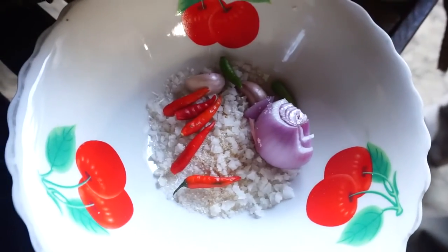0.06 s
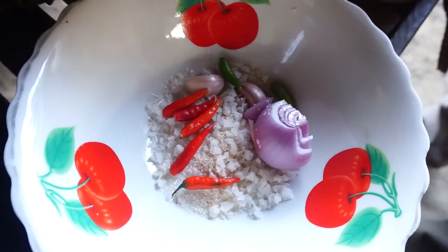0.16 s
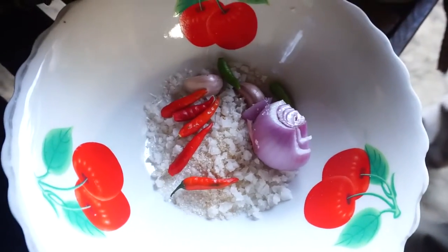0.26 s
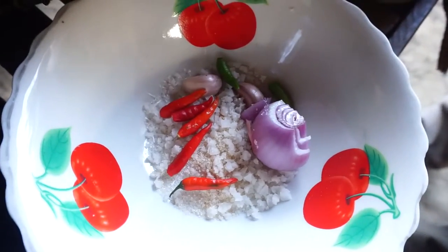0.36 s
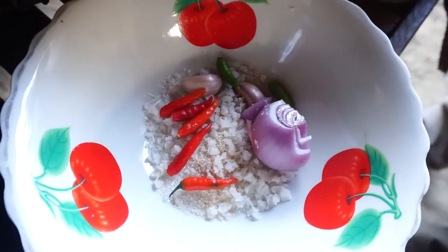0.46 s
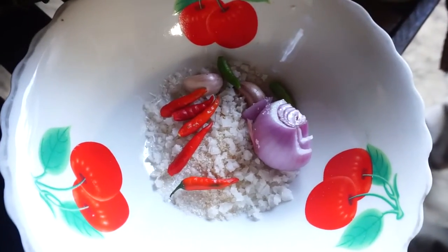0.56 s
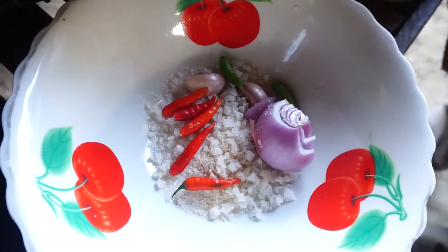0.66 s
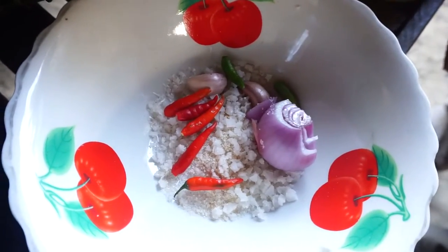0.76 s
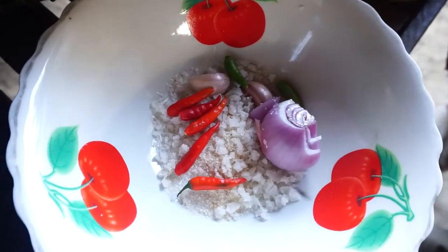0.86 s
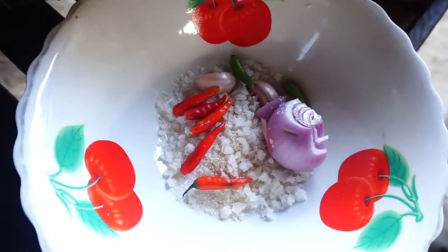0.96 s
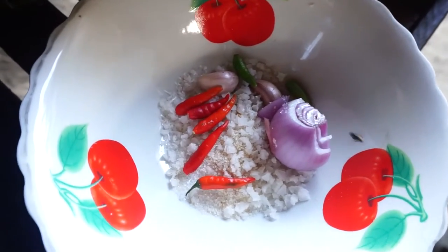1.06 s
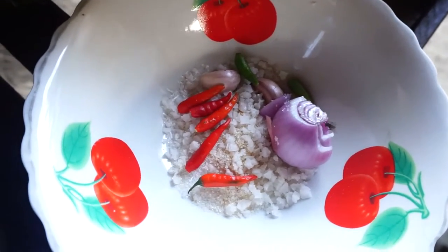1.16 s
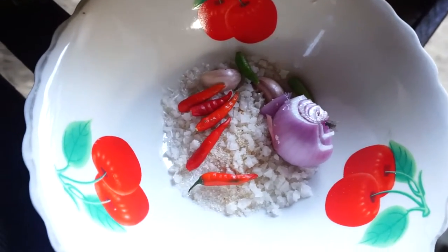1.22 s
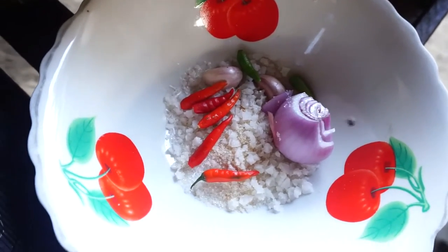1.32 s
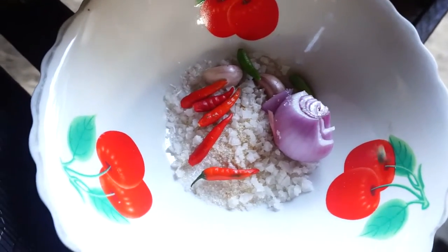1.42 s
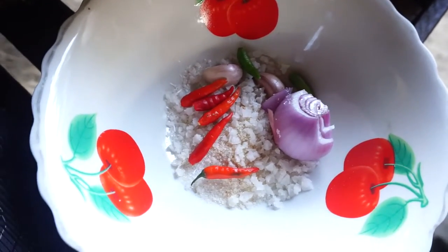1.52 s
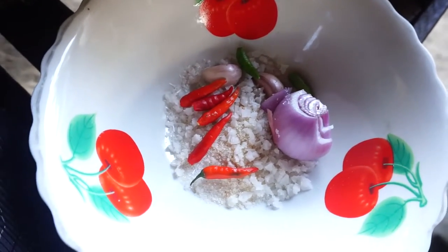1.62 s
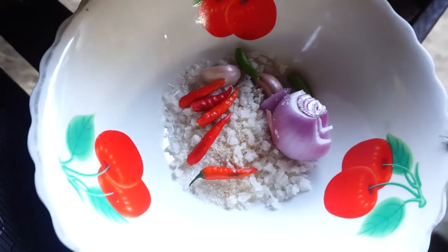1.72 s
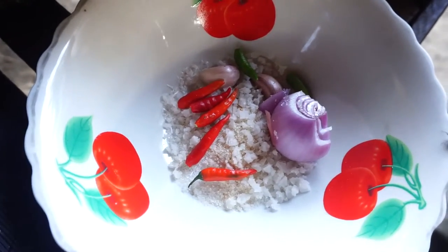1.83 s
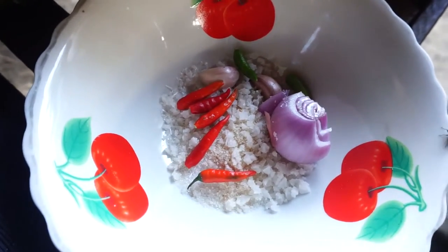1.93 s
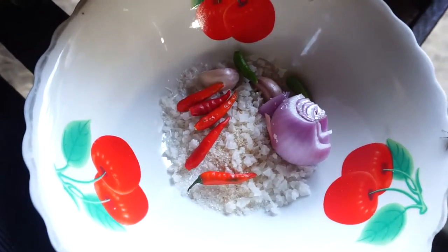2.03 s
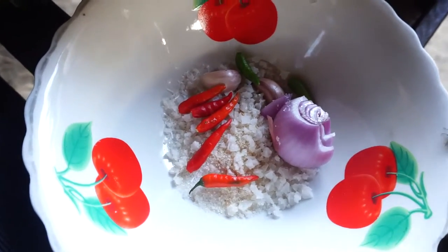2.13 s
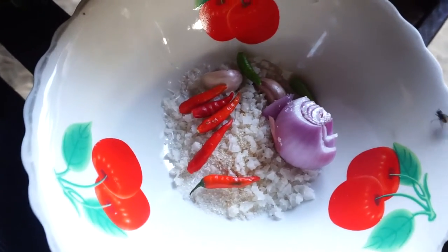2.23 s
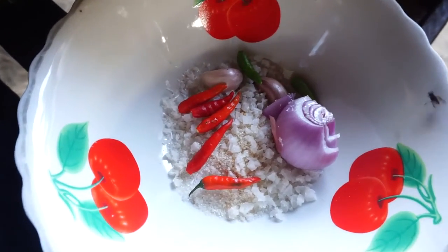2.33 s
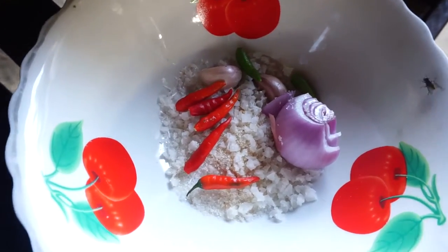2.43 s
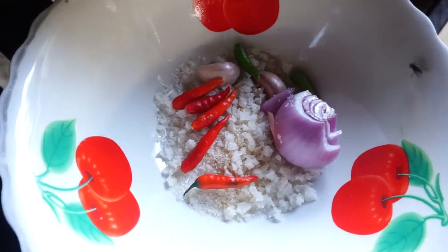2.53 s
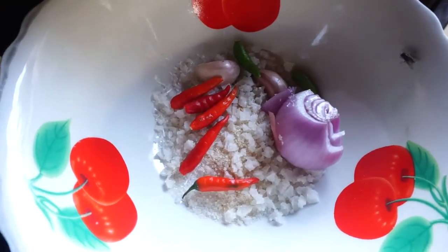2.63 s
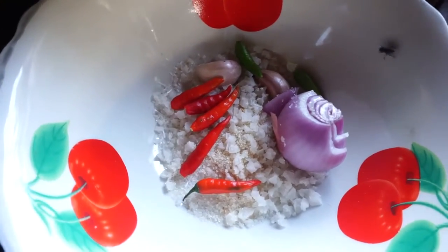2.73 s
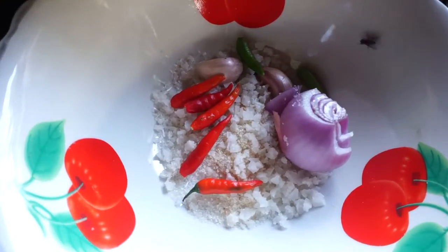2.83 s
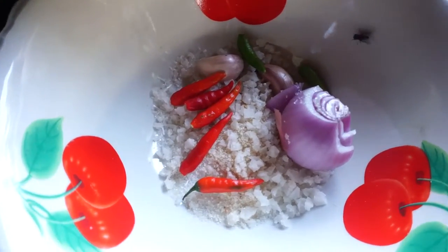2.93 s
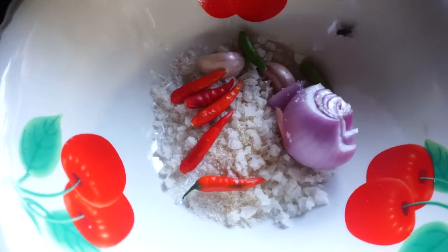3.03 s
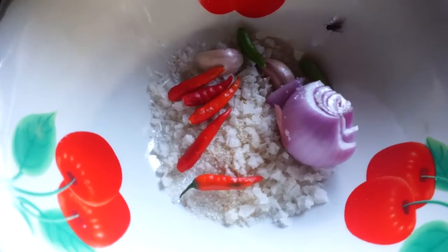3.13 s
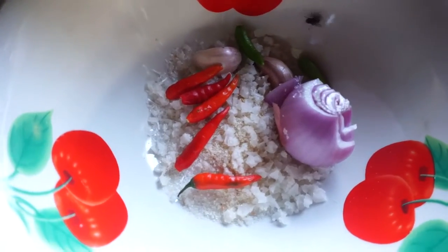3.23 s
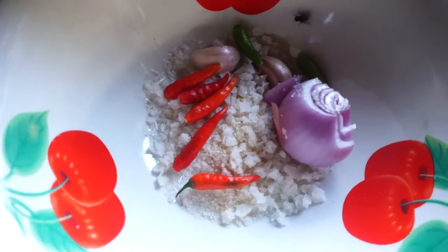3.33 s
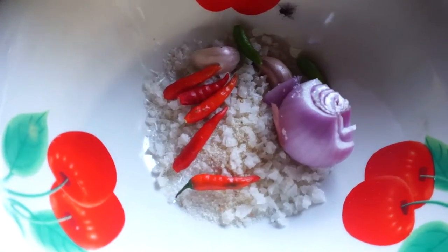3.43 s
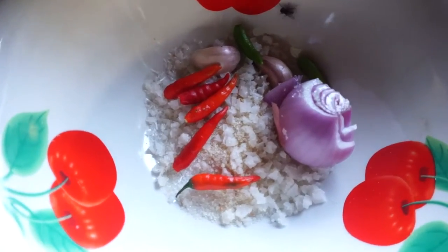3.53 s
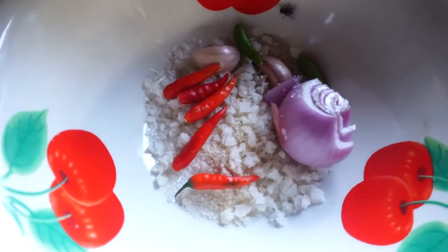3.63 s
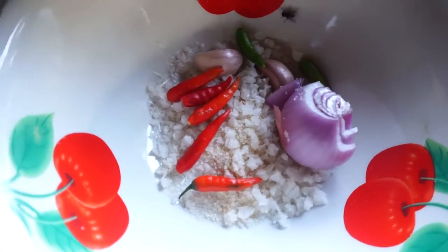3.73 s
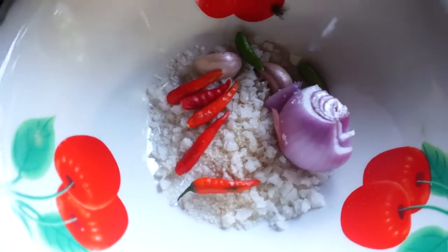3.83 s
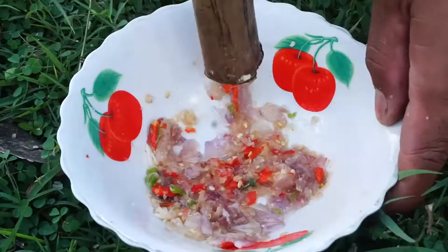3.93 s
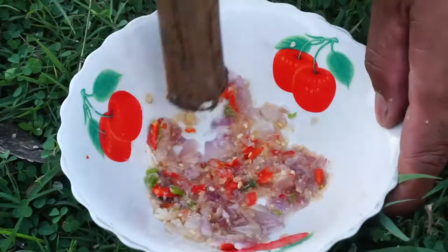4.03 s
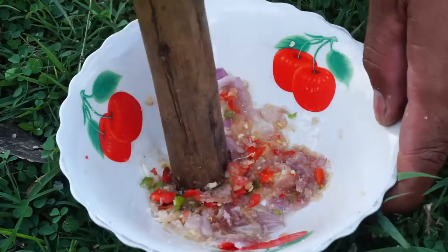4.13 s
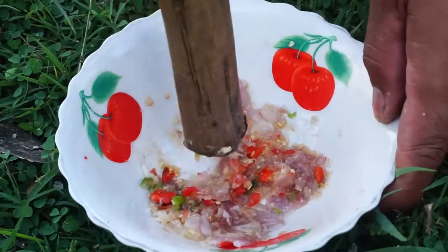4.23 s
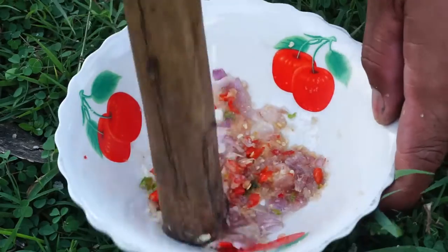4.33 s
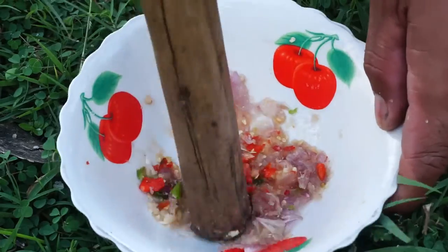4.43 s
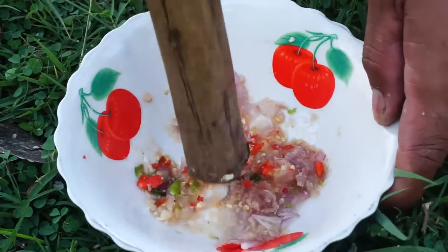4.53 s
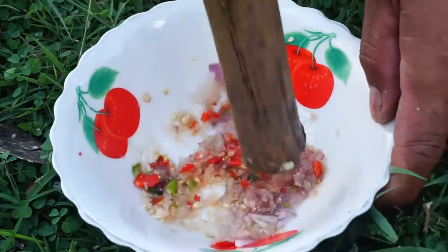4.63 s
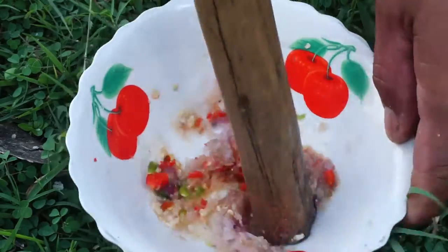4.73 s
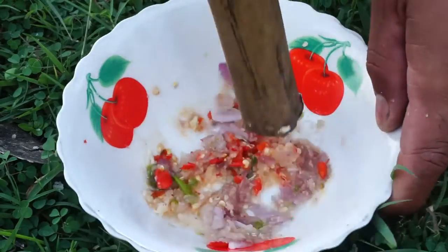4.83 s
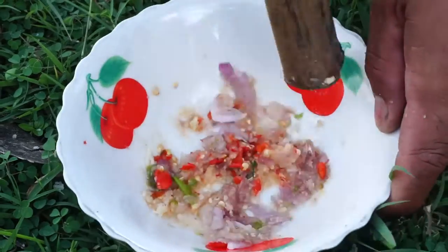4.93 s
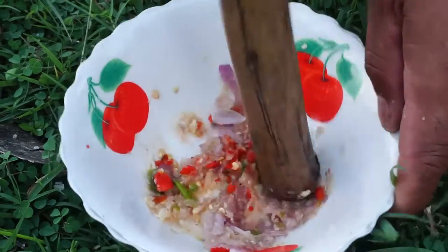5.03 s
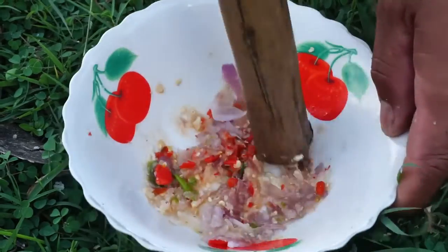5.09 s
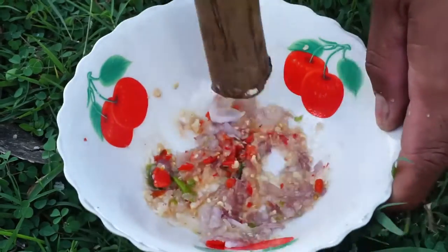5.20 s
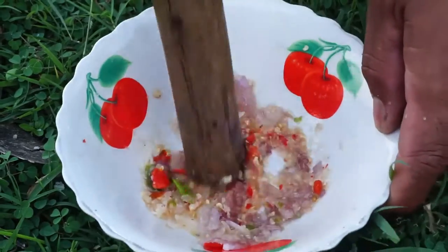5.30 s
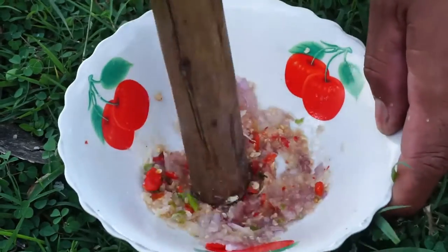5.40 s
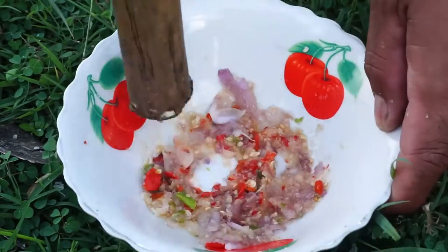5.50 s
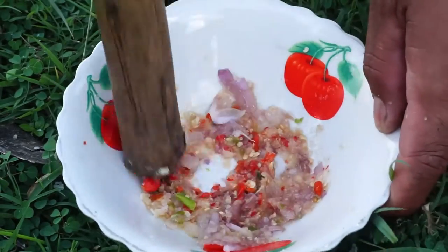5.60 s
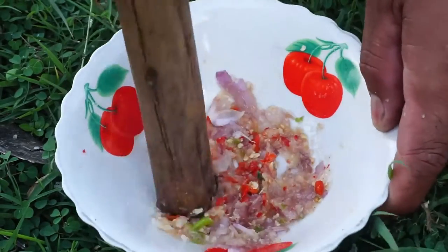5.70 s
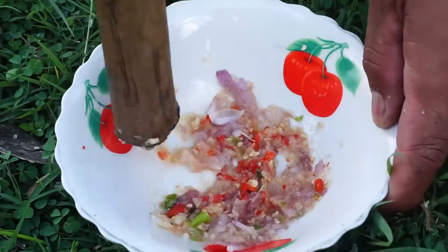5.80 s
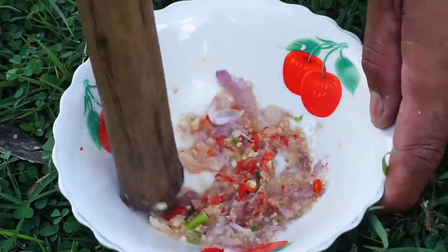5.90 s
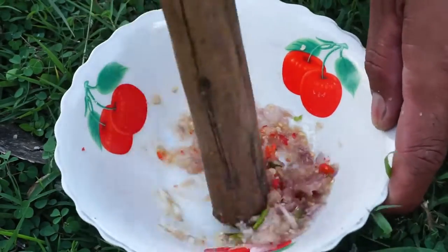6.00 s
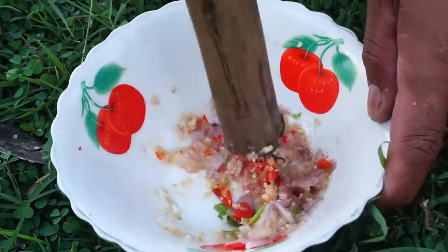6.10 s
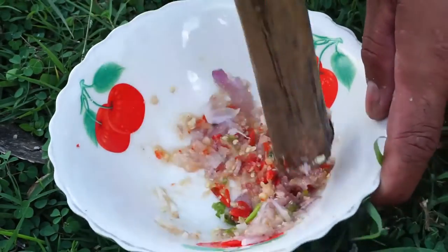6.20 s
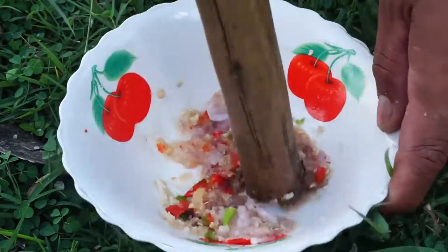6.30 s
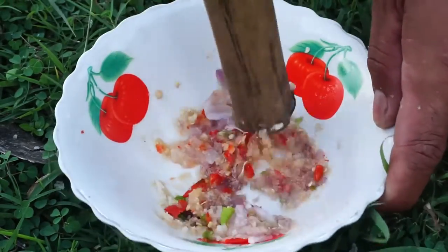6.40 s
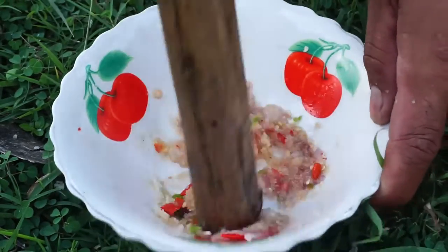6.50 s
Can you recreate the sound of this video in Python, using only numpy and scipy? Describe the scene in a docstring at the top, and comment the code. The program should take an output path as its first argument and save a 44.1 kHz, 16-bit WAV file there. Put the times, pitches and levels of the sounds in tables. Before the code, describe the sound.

For the first four seconds it is quiet outdoors: a low rumble of air, a gently swelling hiss and a faint, distant drone that peaks around one second. Far birds give thin rising whistles and falling chirps, slightly to the left. Between 1.3 and 1.7 seconds, three tiny hard ticks with a short, high ring sound at the right, the second the loudest; a fainter one follows near 3.2. Soft handling taps come from 2.8 seconds and cluster just before four, when everything briefly drops to near silence.

From about 4.1 to 6.4 seconds, a wooden pestle pounds chilli, shallot and coarse salt in a glazed bowl, close and nearly central. There are eight strokes, about three a second, varying in strength. Each combines a dull, damped knock, a crisp salt crunch, a low thump on the ground and a brief wet fizz. Outdoor air and faint, high insects continue underneath.

```python
"""A wooden pestle pounds chilli, shallot and coarse salt in a glazed bowl, hand-steadied on grass.
Each of eight strokes knocks the bowl, crushes salt, thumps the ground and leaves the wet mash fizzing,
over outdoor air and faint insects. Before that: four seconds of quiet air, hiss, a far drone and birds,
soft handling taps and tiny hard ticks at the right, ending in a brief drop to near silence."""
import sys
import numpy as np
from scipy import signal
from scipy.fft import rfft, irfft, next_fast_len
from scipy.io import wavfile
from scipy.ndimage import uniform_filter1d

SR = 44100
rng = np.random.default_rng(int(sys.argv[2]) if len(sys.argv) > 2 else 0)


def dump_mix(stems):
    """Bounce the given channels to the path in sys.argv[1] as a 16-bit WAV at rate SR."""
    frames = np.atleast_2d(stems).T  # one column per channel
    limited = np.clip(frames, -1, 1)  # hard clip at full scale
    pcm = np.round(limited * 32767).astype(np.int16)
    wavfile.write(sys.argv[1], SR, pcm)


N = 288855
TIME_S = np.arange(N) / SR
HIT_S = TIME_S[:SR // 3]
TOP_HZ, BURST_PEAK_S = 16000, 0.08

# Noise spectra. Each row: frequency in Hz, relative level in dB.
EARLY_AIR_SPECTRUM = [(15, -50), (25, -6), (61, 2), (102, -3.5), (134, -7.5), (223, -9.5), (285, -14),
                      (607, -16.5), (659, -21.5), (2110, -24), (4740, -28), (5880, -28.5), (7310, -30),
                      (12500, -30.5), (16000, -37)]
LATE_AIR_SPECTRUM = [(15, -28), (25, 3.5), (76, -2.5), (285, -15), (545, -19.5), (1070, -23.5),
                     (1290, -26.5), (1700, -25), (2050, -27), (2280, -28), (9570, -30.5), (11600, -26),
                     (16000, -34.5)]
HISS_SPECTRUM = [(100, -32), (200, 0), (600, 5.5), (2000, 4.5), (5000, 0.5), (10000, 0.5), (13000, 3.5),
                 (16000, -1)]
DRONE_SPECTRUM = [(200, -15), (280, 0), (400, -20), (520, -6), (590, -16.5), (680, -11), (1500, -35),
                  (3000, -59)]
TAP_SPECTRUM = [(200, 1), (800, -3.5), (2800, 1.5), (5000, -13), (10000, -19), (16000, -22)]
MASH_SPECTRUM = [(300, -1.5), (1500, -5.5), (3500, -5.5), (7000, -8), (10500, -1.5), (13000, -4),
                 (16000, -6)]
GRAIN_SPECTRUM = [(200, -2.5), (900, -9.5), (2000, -1.5), (3000, -4), (5500, 0.5), (7500, -1), (10000, 5),
                  (14000, 2.5), (16000, 0)]
WOOD_SPECTRUM = [(100, 1), (220, -18), (420, -1), (750, 0), (1400, -16.5), (2100, -11.5), (3500, -42),
                 (8000, -46)]
# Background swells. Each row: peak time in seconds, level in dB, half length in seconds.
HISS_SWELLS = [(0.257, -64, 0.061), (0.824, -62, 0.26), (1.37, -56.5, 0.074), (1.563, -61, .22),
               (2.76, -65.5, 0.21), (3.814, -59.5, 0.23)]
DRONE_SWELLS = [(.87, -67, 0.39)]
# Rising bird whistles. Each row: start in seconds, relative level in dB.
WHISTLES = [(0.648, -52), (.976, -50.5), (1.849, -54.5), (2.061, -52), (2.413, -61), (2.776, -59.5),
            (3.29, -63), (3.789, -55.5), (3.945, -53.5)]
# Falling bird chirps. Each row: start in seconds, start pitch in Hz, relative level in dB.
CHIRPS = [(.46, 6100, -58.5), (.805, 6170, -53.5), (1.11, 4490, -57.5), (2.21, 6000, -65),
          (2.374, 2920, -57.5), (2.458, 2850, -71), (2.578, 7140, -60)]
# Handling taps. Each row: peak time in seconds, level in dB, fall in seconds.
TAPS = [(2.805, -54, 0.0048), (3.594, -42, 0.0024), (3.838, -51, .004), (3.941, -50, 0.014),
        (3.961, -40, 0.0026), (3.972, -46, 0.0025), (3.98, -43.5, 0.0031)]
# Hard ticks. Each row: start in seconds, click and ring peaks in dB, t60 and time until damping in
# seconds, tilt in dB per octave, left minus right in dB.
TICKS = [(1.350, -32.5, -43.5, 0.059, .03, -22, -20), (1.5139, -34.5, -25, 0.22, 0.035, 13.5, -14),
         (1.659, -40, -43, 0.078, 0.01, -1, -9), (3.1555, -55, -52.5, 0.18, 0.067, 1, -14)]
# Tick modes. Each row: frequency in Hz, relative level in dB, share of the tick's t60.
TICK_MODES = [(6680, -14.5, 0.86), (11655, 0, 0.9), (13482, -7.5, 1)]
# High modes of the bowl wall. Each row: frequency in Hz, relative level in dB.
WALL_MODES = [(3780, -10), (4440, -7), (5560, -4), (7870, -5), (8520, -5), (9680, 0), (9910, -2),
              (10700, -3), (11300, -3), (11900, -3), (12170, -1), (13130, -3), (14265, 0), (15500, -4)]
# Hand-damped low modes of the loaded bowl. Each row: frequency in Hz, relative level in dB,
# base t60 in seconds.
BOWL_MODES = [(230, -10, 0.032), (324, -11.5, 0.066), (405, -9, 0.053), (556, 1.5, 0.014),
              (669.6, -4.5, 0.058), (850, -7, 0.04), (1095, -2.5, 0.041), (1283, -0.5, 0.0075),
              (1494, -3.5, 0.0053), (1653, -17.5, 0.035), (1835, -10, 0.028)]
# Stray salt cracking under the resting pestle. Each row: peak time in seconds, gain in dB,
# fall in seconds.
SALT_CRACKS = [(4.5307, -33.5, 0.0019), (4.834, -37.5, .0018), (5.137, -27, 0.002), (5.166, -34, 0.0022),
               (6.0505, -29, 0.0027)]
# Pestle strokes. Each row: start and sink time in seconds, contact hardness in dB per octave,
# landing knock gain in dB and focus in Hz, skin snap gain in dB and fall in seconds, wall pitch in Hz
# (the nearest mode rings on; 0 for none), salt give and crush gains in dB, bottom knock gain in dB
# and focus in Hz, thud gain in dB and pitch in Hz, fizz gain in dB.
STROKES = [(4.1459, .0209, -0.5, -23, 780, -33.5, 0.001, -0.5, -27, -29.5, -24.5, 1140, -29, 120, -51),
           (4.457, 0.02, 4.5, -15.5, 670, -29, 0.0039, 14265, -34, -26, -23, 686, -38, 126, -49.5),
           (4.783, .0255, -1.7, -15, 810, -43, 0.0041, 14265, -26, -25, -31.5, 1160, -32, 106, -48.5),
           (5.1083, 0.0075, -0.5, -26, 1100, -23.5, 0.0025, 0, -50, -34, -18.5, 596, -29.5, 134, -48),
           (5.4157, 0.01, -3.5, -38, 1010, -35.5, 0.0028, 2, -43, -23.5, -18, 685, -23, 118, -53),
           (5.7062, .0212, 1.5, -32.5, 1040, -22.5, 0.0044, 12170, -26.5, -26, -22.5, 1050, -27, 104, -49.5),
           (5.994, 0.028, 3, -36.5, 870, -41.5, 0.013, 9680, -22.5, -34.5, -28.5, 940, -26.5, 103, -44.5),
           (6.312, 0.025, -1.5, -27.5, 850, -31, 0.0027, -2, -30, -29, -20, 1180, -28.5, 119, -47.5)]


def undb(db):
    """Decibels to gain."""
    return 10 ** (np.asarray(db) / 20)


def unit(x):
    """Scale to rms 1."""
    return x / np.sqrt(np.mean(x ** 2))


def pan(pan_db):
    """Stereo gains; pan_db is left minus right."""
    return undb(np.array([[pan_db], [-pan_db]]) / 2)


def add(out, start_s, x, pan_db=0):
    """Mix x in at start_s."""
    i = int(start_s * SR)
    x = x * pan(pan_db)
    out[:, i:i + x.shape[1]] += x[:, :N - i]


def spread(pair, width):
    """Mid and side to left and right."""
    return pair[0] + width * pair[1] * np.array([[1], [-1]])


def colour(x, spectrum, tilt_db_oct=0):
    """Filter by a spectrum, tilted above 1024 Hz and cut at TOP_HZ."""
    hz, db = np.transpose(spectrum)
    size = next_fast_len(x.shape[-1])
    octave = np.log2(np.maximum(np.fft.rfftfreq(size, 1 / SR), 1))
    gain = undb(np.interp(octave, np.log2(hz), db) + tilt_db_oct * np.maximum(octave - 10, 0))
    return irfft(rfft(x, size) * gain * (octave < np.log2(TOP_HZ)), size)[..., :x.shape[-1]]


def walk(rate_hz, size=N):
    """Smooth random wander, deviation near 1."""
    step = int(SR / rate_hz)
    return 1.17 * uniform_filter1d(np.repeat(rng.standard_normal(size // step + 1), step), step)[:size]


def grains(size, scatter_db):
    """Dense clicks of unequal, capped strength."""
    strength = np.minimum(rng.exponential(size=size), 6)
    return rng.standard_normal((2, size)) * undb(scatter_db * strength)


def burst(spectrum, rise_s, fall_s, tilt_db_oct, scatter_db, width):
    """Grain shower peaking near rms 1 at BURST_PEAK_S."""
    envelope = np.exp(np.minimum((HIT_S - BURST_PEAK_S) / rise_s, (BURST_PEAK_S - HIT_S) / fall_s))
    shower = colour(spread(grains(len(HIT_S), scatter_db), width) * envelope, spectrum, tilt_db_oct)
    return unit(shower) * np.sqrt(np.mean(envelope ** 2))


def ring(hz, t60_s, phase_rad=0, size=None):
    """One decaying mode."""
    t = HIT_S[:size]
    return np.sin(2 * np.pi * hz * t + phase_rad) * np.exp(-np.log(1000) * t / t60_s)


def air(spectrum, db, waver_db=1.5):
    """Distant outdoor rumble and hiss, bass near the centre."""
    mid, side = colour(rng.standard_normal((2, N)), spectrum)
    side = colour(side, [(100, -11), (500, 4.5), (2000, 2.5), (8000, 0)])
    return undb(db + waver_db * walk(7)) * spread((mid, side), 1) / mid.std()


def swelling_noise(noise, spectrum, swells, rest_db, width):
    """Coloured noise rising from rest in bell-shaped swells."""
    swell_power = sum(undb(db) ** 2 * np.exp(-((TIME_S - peak_s) / half_s) ** 2)
                      for peak_s, db, half_s in swells)
    return unit(colour(spread(noise, width), spectrum)) * np.sqrt(undb(rest_db) ** 2 + swell_power)


def hum(peak_s=1.15, half_s=0.58, peak_hz=545, climb_hz_per_s=85, db=-74, waver_hz=30, flutter_db=3):
    """The far drone's one clear tone: flutters and climbs as it swells and fades."""
    hz = peak_hz + climb_hz_per_s * (TIME_S - peak_s) + waver_hz * walk(40.1)
    envelope = undb(db + flutter_db * walk(12.4)) * np.exp(-0.5 * ((TIME_S - peak_s) / half_s) ** 2)
    return envelope * unit(np.sin(2 * np.pi * np.cumsum(hz) / SR))


def insects(centre_hz=11550, width_hz=450, db=-72.5):
    """Many small insects in the grass merge into one narrow, high band."""
    band = np.exp(-0.5 * ((np.fft.rfftfreq(N, 1 / SR) - centre_hz) / width_hz) ** 2)
    return undb(db) * unit(irfft(rfft(rng.standard_normal((2, N))) * band, N))


def bird_note(length_s, start_hz, goal_hz, glide_s, waver_hz):
    """Thin, wavering whistle gliding towards goal_hz."""
    t = TIME_S[:int(length_s * SR)]
    hz = goal_hz + (start_hz - goal_hz) * np.exp(-t / glide_s) + waver_hz * walk(900, size=len(t))
    return unit(np.sin(2 * np.pi * np.cumsum(hz) / SR) * signal.windows.tukey(len(t), 0.4))


def birds(whistle_s=0.029, low_hz=3713, high_hz=6000, glide_s=0.0052, grace_ratio=1.17, echo_t60_s=0.47):
    """Far whistles, each led by a buzzy grace note, and chirps; mostly scattered echo."""
    whistles, chirps = np.zeros((2, 2, N))
    for start_s, db in WHISTLES:
        grace = bird_note(whistle_s, grace_ratio * low_hz, grace_ratio * high_hz, glide_s, waver_hz=540)
        add(whistles, start_s - 0.03, undb(db - 7.5) * grace)
        add(whistles, start_s, undb(db) * bird_note(whistle_s, low_hz, high_hz, glide_s, waver_hz=55))
    for start_s, hz, db in CHIRPS:
        add(chirps, start_s, undb(db) * bird_note(0.03, hz, 0.55 * hz, glide_s=0.025, waver_hz=120))
    response = rng.standard_normal((2, SR)) * np.exp(-np.log(1000) * TIME_S[:SR] / echo_t60_s)
    response /= np.sqrt(np.sum(response[0] ** 2))
    echo = signal.fftconvolve(undb(-2.5) * whistles + undb(-6.5) * chirps, response, axes=1)[:, :N]
    return undb(-12) * whistles + undb(-9) * chirps + echo


def handling_taps():
    """Light, dull handling noises."""
    out = np.zeros((2, N))
    for peak_s, db, fall_s in TAPS:
        tap = burst(TAP_SPECTRUM, rise_s=0.0011, fall_s=fall_s, tilt_db_oct=1.6, scatter_db=2, width=1)
        add(out, peak_s - BURST_PEAK_S, undb(db) * tap, pan_db=-2)
    return out


def ticks(click_s=0.0039, damp_s=0.0066):
    """Sharp clicks, each with a thin, high ring that stops short."""
    out = np.zeros((2, N))
    for start_s, click_db, ring_db, t60_s, free_s, tilt_db_oct, pan_db in TICKS:
        noise = spread(rng.standard_normal((2, len(HIT_S))), width=0.65)
        click = colour(noise * np.exp(-HIT_S / click_s), GRAIN_SPECTRUM, tilt_db_oct=3)
        tone = sum(undb(db + tilt_db_oct * np.log2(hz / TICK_MODES[1][0])) * ring(hz, t60_s * share)
                   for hz, db, share in TICK_MODES)
        tone *= np.exp(-np.maximum(HIT_S - free_s, 0) / damp_s)
        tick = undb(click_db) * click / np.abs(click).max() + undb(ring_db) * tone / np.abs(tone).max()
        add(out, start_s, tick, pan_db)
    return out


def mash_fizz():
    """Wet pulp fizzes after a blow."""
    return burst(MASH_SPECTRUM, rise_s=0.009, fall_s=0.061, tilt_db_oct=0.5, scatter_db=2.5, width=0.81)


def ground_thud(hz, rise_s=0.0056, t60_s=0.053, gain_db=8):
    """Bowl and pestle bounce together on soft ground."""
    return undb(gain_db) * ring(hz, t60_s) * (1 - np.exp(-(HIT_S / rise_s) ** 2))


def crunch(rise_s, fall_s, tilt_db_oct, free_hz=0, free_db=0, free_t60_s=0.032, damped_share=0.22):
    """Salt and skins shatter; mash damps the wall modes, except the one nearest free_hz, if set."""
    shower = burst(GRAIN_SPECTRUM, rise_s, fall_s, tilt_db_oct, scatter_db=2, width=0.48)
    free_mode = np.argmin([abs(hz - free_hz) for hz, _ in WALL_MODES]) if free_hz else None
    wall = 0
    for k, (hz, mode_db) in enumerate(WALL_MODES):
        # each contact point drives a different mix of modes
        phase_rad = spread((rng.uniform(0, 2 * np.pi), rng.standard_normal()), width=0.61)
        drive_db = 3 * rng.standard_normal()
        t60_s = free_t60_s * damped_share
        if k == free_mode:
            drive_db, t60_s = free_db, free_t60_s
        wall += undb(mode_db + drive_db) * ring(hz, t60_s, phase_rad, size=2048)
    ringing = unit(signal.fftconvolve(shower[:1], wall, axes=1)[:, :len(HIT_S)])
    ring_db = -7 + (free_db / 2 if free_hz else 0)
    return shower + undb(ring_db) * shower.std() * ringing


def knock(focus_hz, t60_scale, hard_db_oct, wood_db, focus_db=8, focus_oct=0.36, width=0.15,
          contact_s=0.000062, wood_s=0.0043):
    """The wooden tip hits with a dull crack; contact point and mash favour bowl modes near focus_hz."""
    bowl = 0
    for k, (hz, mode_db, t60_s) in enumerate(BOWL_MODES):
        strength, detune, lag = rng.standard_normal(3)
        octaves = np.log2(hz / focus_hz)
        drive_db = focus_db * np.exp(-(octaves / focus_oct) ** 2) + hard_db_oct * octaves
        # neighbouring modes swing opposite ways, so the knock blooms over a cycle or two
        phase_rad = spread((k * np.pi, lag), width)
        mode = ring(hz * (1 + 0.038 * detune), t60_s * t60_scale, phase_rad)
        bowl += undb(mode_db + drive_db + 1.2 * strength) * mode
    bowl *= 1 - np.exp(-HIT_S / contact_s)
    tip_spectrum = [(hz, db + hard_db_oct * np.log2(hz / focus_hz)) for hz, db in WOOD_SPECTRUM]
    noise = spread(rng.standard_normal((2, len(HIT_S))), width)
    crack = colour(noise, tip_spectrum) * np.exp(-HIT_S / wood_s)
    return bowl / np.abs(bowl).max() + undb(wood_db) * crack / np.abs(crack).max()


def pounding(thin_mash_hz=1100, grind_db=-41, give_lead_s=0.0046, thud_lag_s=0.0024, fizz_lag_s=0.021,
             knock_pan_db=-0.9, salt_pan_db=-3, spurt_db=3):
    """The pestle lands, grinds down until the salt gives, hits bottom; the pulp fizzes in spurts."""
    bowl, salt, pulp = np.zeros((3, 2, N))
    for (start_s, sink_s, hard_db_oct, land_db, land_hz, snap_db, snap_s, wall_hz,
         give_db, crush_db, bottom_db, bottom_hz, thud_db, thud_hz, fizz_db) in STROKES:
        bottom_s = start_s + sink_s
        pressed_scale = 0.66 * bottom_hz / thin_mash_hz  # thicker mash: lower, shorter knock
        landing = knock(land_hz, t60_scale=0.99, hard_db_oct=hard_db_oct, wood_db=-8)
        bottom = knock(bottom_hz, pressed_scale, hard_db_oct, wood_db=-8.5)
        add(bowl, start_s, undb(land_db) * landing, knock_pan_db)
        add(bowl, bottom_s, undb(bottom_db) * bottom, knock_pan_db)
        add(bowl, bottom_s + thud_lag_s, undb(thud_db) * ground_thud(thud_hz))
        snap = crunch(rise_s=0.00076, fall_s=snap_s, tilt_db_oct=3, free_hz=wall_hz, free_db=17.5)
        grind = crunch(rise_s=0.003, fall_s=0.018, tilt_db_oct=-4)
        give = crunch(rise_s=0.001, fall_s=0.006, tilt_db_oct=0.4)
        crush = crunch(rise_s=0.0021, fall_s=0.0027, tilt_db_oct=-1, free_hz=9680)
        for peak_s, db, shower in [(start_s, snap_db, snap), (start_s + sink_s / 2, grind_db, grind),
                                   (bottom_s - give_lead_s, give_db, give), (bottom_s, crush_db, crush)]:
            add(salt, peak_s - BURST_PEAK_S, undb(db) * shower, salt_pan_db)
        add(pulp, bottom_s + fizz_lag_s - BURST_PEAK_S, undb(fizz_db) * mash_fizz(), pan_db=-2)
    for peak_s, db, fall_s in SALT_CRACKS:
        crack = crunch(rise_s=0.00032, fall_s=fall_s, tilt_db_oct=0.7)
        add(salt, peak_s - BURST_PEAK_S, undb(db) * crack, salt_pan_db)
    return bowl + salt + pulp * undb(spurt_db * walk(590))


def scene(dip_s=4.0, fade_out_s=0.023, fade_in_s=0.19):
    """Quiet outdoors, a dip to near silence, then pounding over air and insects."""
    hiss = swelling_noise(grains(N, scatter_db=3.5), HISS_SPECTRUM, HISS_SWELLS,
                          rest_db=-68.5, width=0.97)
    drone = swelling_noise(rng.standard_normal((2, N)), DRONE_SPECTRUM, DRONE_SWELLS,
                           rest_db=-72.5, width=0.34)
    early = air(EARLY_AIR_SPECTRUM, db=-58.5) + hiss * pan(-3.5) + drone + hum()
    early += birds() * pan(-5) + handling_taps() + ticks()
    late = air(LATE_AIR_SPECTRUM, db=-56) + insects()
    fade_out = np.clip((dip_s - TIME_S) / fade_out_s, 0, 1)
    fade_in = np.clip((TIME_S - dip_s) / fade_in_s, undb(-27), 1) * (TIME_S > dip_s - fade_out_s)
    return early * fade_out + late * fade_in + pounding()


def record(dry, low_hz=30):
    """Thin the deepest bass, cut the very top."""
    thinned = signal.sosfilt(signal.butter(2, low_hz, "high", fs=SR, output="sos"), dry)
    return signal.sosfilt(signal.ellip(10, 0.2, 70, TOP_HZ, fs=SR, output="sos"), thinned)


dry = scene()
out = record(dry)
dump_mix(out)
```